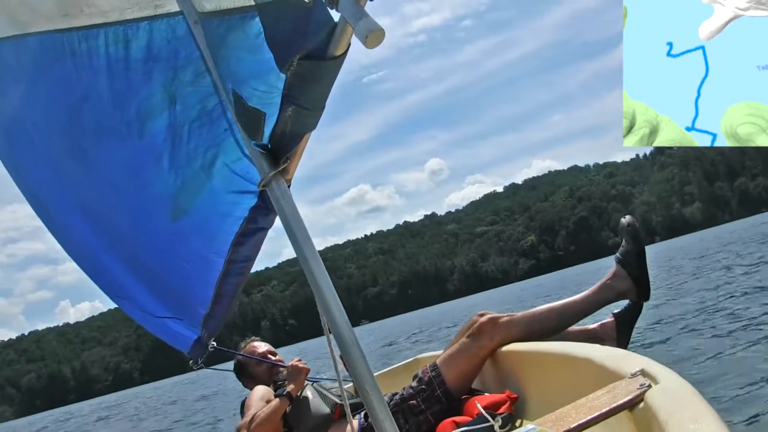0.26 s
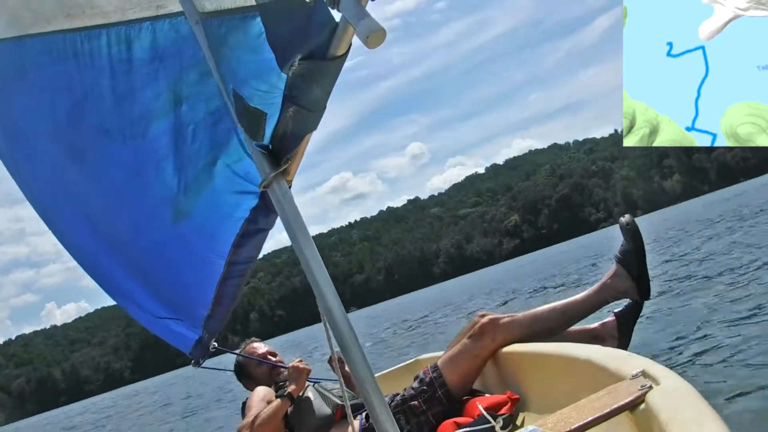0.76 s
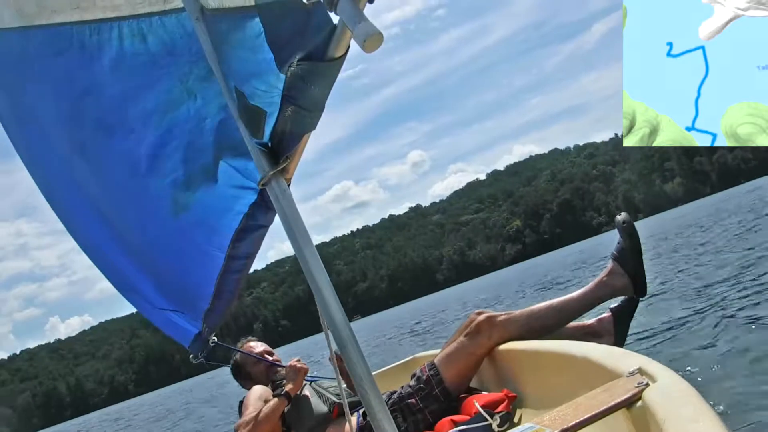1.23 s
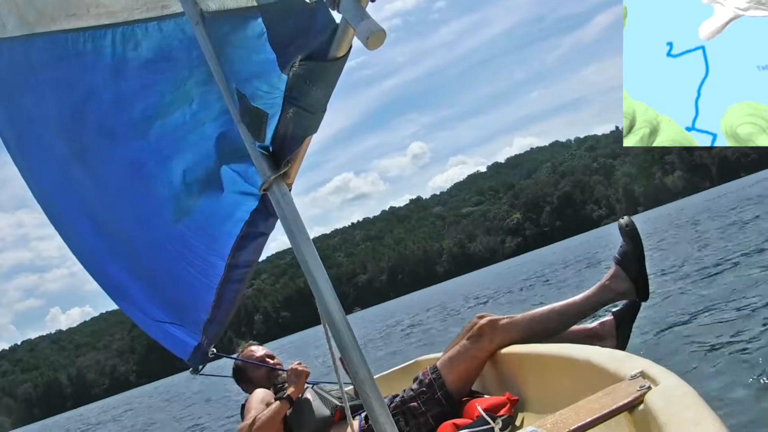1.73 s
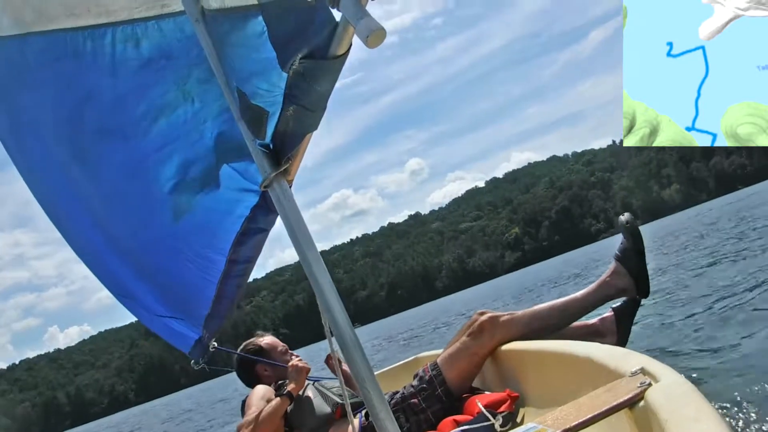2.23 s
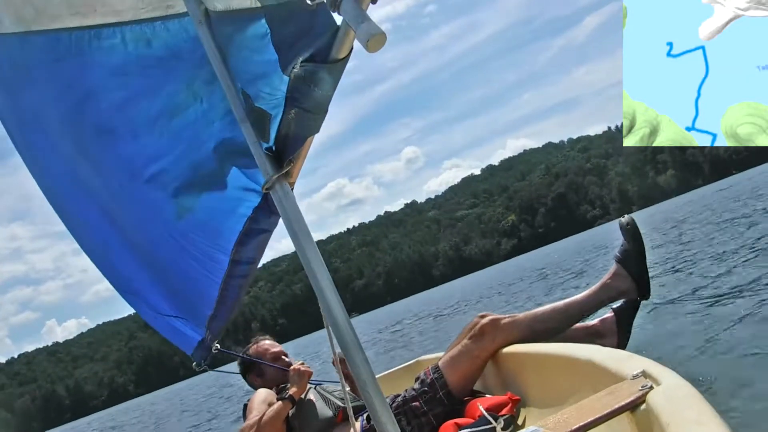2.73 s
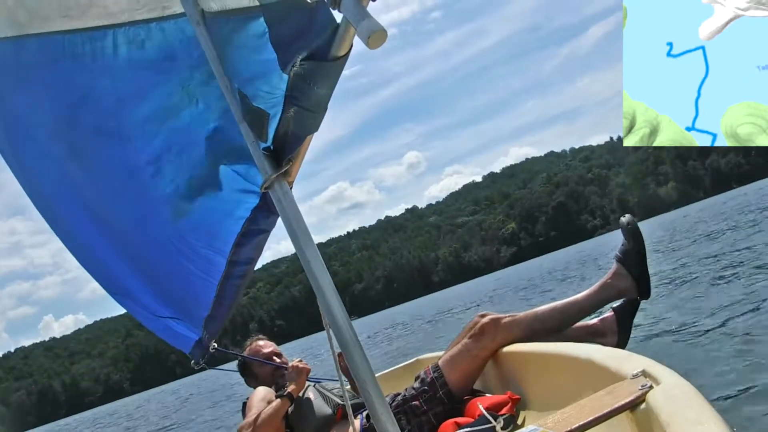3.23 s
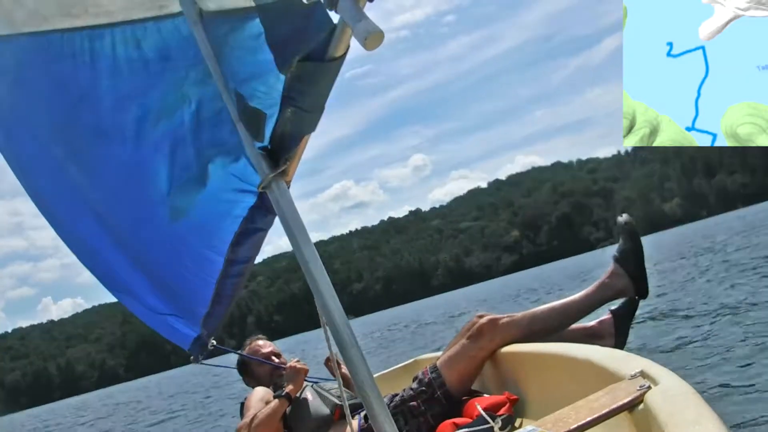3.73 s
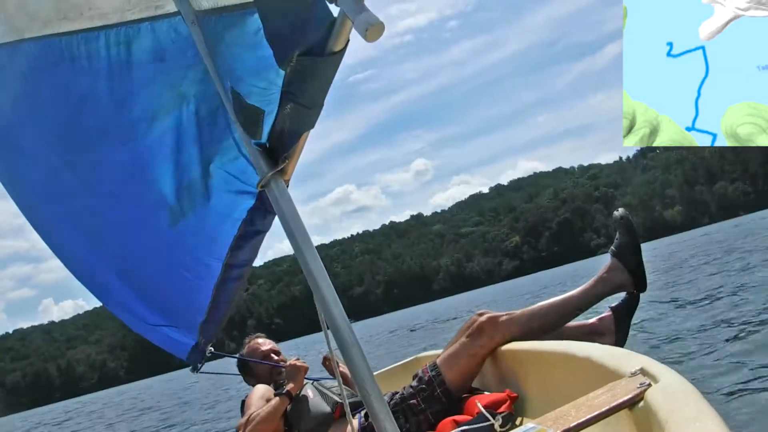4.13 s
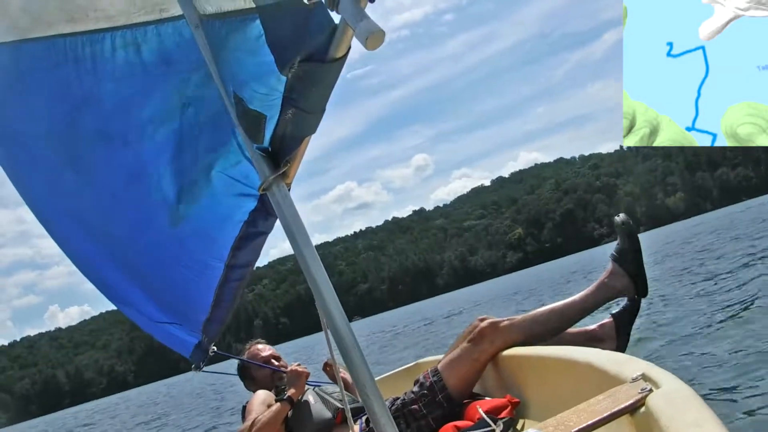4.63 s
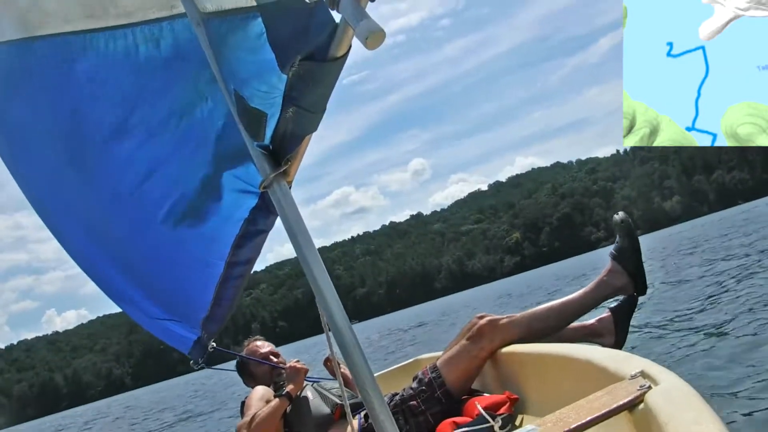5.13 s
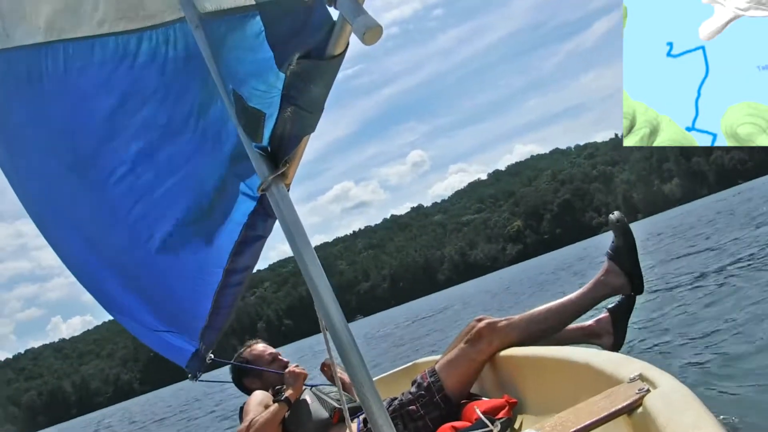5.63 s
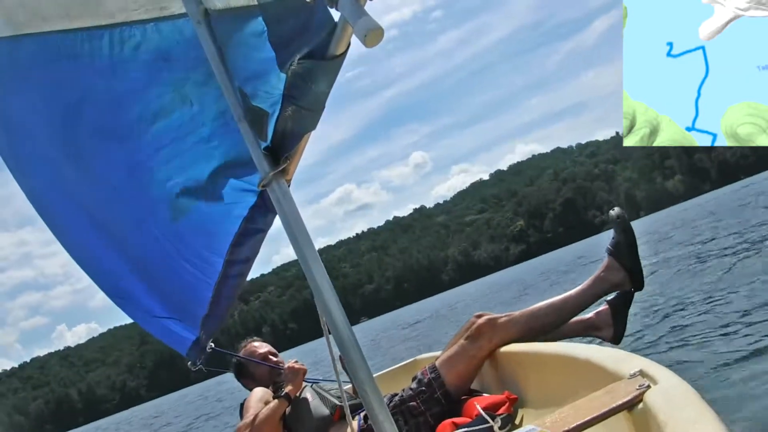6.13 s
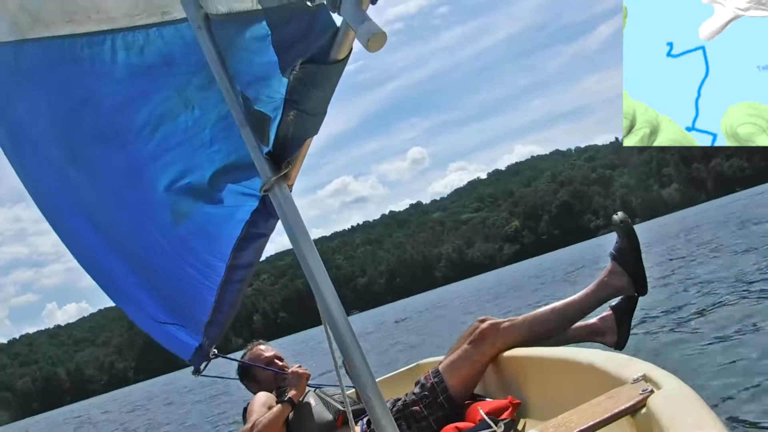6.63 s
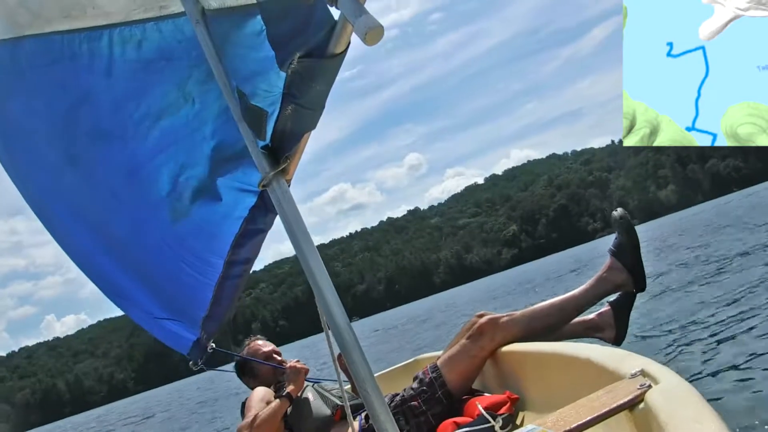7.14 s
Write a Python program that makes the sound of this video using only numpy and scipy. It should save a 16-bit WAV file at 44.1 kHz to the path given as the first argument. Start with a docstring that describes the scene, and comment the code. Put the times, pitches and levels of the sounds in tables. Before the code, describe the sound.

From the start, wavelets break close by against the hull of a small sailboat, an irregular run of gurgling bubbles, froth and fine spray, dotted with sharp slaps, hollow plops and ticking droplets. Wind rumbles on the microphone throughout with short thumping gusts, over a faint hiss from the open lake. A splash with a low plop comes at about 1 second, and the hardest slap lands at 1.6 seconds. A big bubbly splash follows at 2.1 seconds. Smaller laps continue, with a brief wind buffet at 3 seconds and a clear plop at 4. Another big splash with a loud plop breaks at 5 seconds, then the wind buffets hardest until nearly 6 seconds. The water eases slightly before a sharp slap at 6.4 seconds and a last splash with a loud plop at about 7 seconds.

```python
"""A small sailboat heels across a lake. From the start, wavelets break on the hull in ringing bubbles,
froth and spray; slaps crack, air pockets plop, and wind rumbles on the microphone over the far lake hiss.
The hardest slap lands at 1.6 s. Big wavelets break at 2.1 s and 5 s, then the wind buffets hardest.
Another sharp slap comes at 6.4 s, and a last big wavelet with a loud plop at 7 s."""
import sys
import numpy as np
from scipy import signal
from scipy.fft import rfft, irfft
from scipy.io import wavfile
from scipy.ndimage import uniform_filter1d

SR = 44100
rng = np.random.default_rng(int(sys.argv[2]) if len(sys.argv) > 2 else 0)


def generate_wav(signal):
    """Clip the signal to [-1, 1] and save it as 16-bit WAV at the path in sys.argv[1]."""
    frames = np.transpose(np.atleast_2d(signal))
    scaled = np.clip(frames, -1, 1) * 32767
    pcm = np.round(scaled).astype(np.int16)
    wavfile.write(sys.argv[1], SR, pcm)


N = 325017


def from_db(db):
    """Decibels to gain."""
    return 10 ** (np.asarray(db) / 20)


def unit_rms(x):
    """Scale to rms 1."""
    return x / np.sqrt(np.mean(x ** 2) + 1e-20)


def curves(rows):
    """Columns of a time table, one value a sample."""
    time_s, *columns = np.transpose(rows)
    return [np.interp(np.arange(N) / SR, time_s, column) for column in columns]


def gain_at(spectrum, hz):
    """Gain of a dB spectrum, read on a log-frequency axis."""
    freq_hz, level_db = np.transpose(spectrum)
    return from_db(np.interp(np.log(hz), np.log(freq_hz), level_db))


def drift(rate_hz):
    """Slow random wander, rms 1: noise through two one-pole low-passes."""
    hop, settle = 40, 2000
    pole = np.exp(-2 * np.pi * rate_hz * hop / SR)
    noise = rng.standard_normal(N // hop + settle + 2)
    slow = signal.lfilter([1], [1, -2 * pole, pole * pole], noise)[settle:]
    return np.interp(np.arange(N) / hop, np.arange(len(slow)), unit_rms(slow))


def coloured(spectrum):
    """Steady noise of a given spectrum, rms 1."""
    hz = np.maximum(np.fft.rfftfreq(N, 1 / SR), 1)
    return unit_rms(irfft(rfft(rng.standard_normal(N)) * gain_at(spectrum, hz), N))


def bandpass(x, low_hz, high_hz, order=2):
    """Butterworth band-pass."""
    return signal.sosfilt(signal.butter(order, [low_hz, high_hz], "band", fs=SR, output="sos"), x)


def place(track, start_s, peak_db, sound):
    """Mix in a short sound at a given peak level."""
    i = round(start_s * SR)
    track[i:i + len(sound)] += from_db(peak_db) * sound[:N - i] / np.abs(sound).max()


def swell_power(rows, column, rise_s, fall_s, build=0, linger=0, sag_db=0):
    """Swells ramp up, sag and die; build and linger add a share of their length to rise and fall."""
    t, power = np.arange(0, N + 32, 32) / SR, 0
    for start_s, length_s, *levels_db in rows:
        rise = np.clip((t - start_s + rise_s) / (rise_s + build * length_s), 0, 1)
        fall = np.exp(-np.maximum(t - start_s - length_s, 0) / (fall_s + linger * length_s))
        level_db = levels_db[column] - sag_db * np.clip((t - start_s) / length_s, 0, 1)
        power = power + (from_db(level_db) * rise * fall) ** 2
    return np.interp(np.arange(N) / SR, t, power)


# far water: freq_hz, relative_db
LAKE_SPECTRUM = [(120, 23), (200, 7), (392, 3), (728, -9), (1430, 4), (4330, -18.5), (5590, -65.5),
                 (7090, -1), (9830, -28.5), (15500, -49)]


def lake(level_db=-48):
    """Far wash of the lake: a gently wavering hiss."""
    return from_db(level_db + 1.3 * drift(9)) * coloured(LAKE_SPECTRUM)


# wind between gusts: time_s, rumble_db, buffet_db
WIND_LEVELS = [(0.0, -52, -44.5), (0.35, -37.5, -45), (2.67, -36, -43.5), (3.0, -32.5, -34.5),
               (3.2, -41, -42), (3.43, -33.5, -38.5), (4.37, -41.5, -50), (4.41, -38.5, -41),
               (5.17, -27.5, -33.5), (5.21, -39.5, -40), (5.68, -31, -36), (5.7, -31.5, -34.5),
               (5.87, -41.5, -47), (6.12, -40, -43.5), (6.71, -39, -47.5), (6.9, -31, -41.5),
               (7.33, -34.5, -38.5), (7.37, -39, -52)]
# thumps on the port: start_s, length_s, rumble_db
GUSTS = [(.445, 0.035, -33), (.805, 0.028, -27.5), (2.18, 0.056, -30), (2.845, 0.054, -35), (2.96, .1, -45),
         (3.385, .1, -30.5), (3.53, 0.033, -28.5), (3.825, 0.075, -32), (4.395, 0.085, -36.5),
         (4.55, 0.11, -34), (4.84, 0.072, -31.5), (5.32, 0.018, -27.5), (5.7, 0.036, -26),
         (6.66, 0.025, -37), (6.9, 0.032, -30)]
# low and upper wind noise: freq_hz, relative_db
RUMBLE_SPECTRUM = [(12, -31), (20, 0.5), (75, 4.5), (140, -4), (180, -16), (310, -120)]
BUFFET_SPECTRUM = [(70, -14), (130, 1.5), (200, -5), (300, -14), (500, -29), (900, -82)]


def wind(buffet_db_per_gust_db=0.79):
    """Eddies on the microphone port: a lurching rumble with buffeting above it."""
    base_db, buffet_db = curves(WIND_LEVELS)
    gust_power = swell_power(GUSTS, 0, rise_s=0.0035, fall_s=0.007)
    rumble_db = 10 * np.log10(from_db(2 * base_db) + gust_power)
    buffet_db = buffet_db + buffet_db_per_gust_db * (rumble_db - base_db)
    rumble = unit_rms(coloured(RUMBLE_SPECTRUM) * from_db(1.42 * drift(35)))
    buffet = unit_rms(coloured(BUFFET_SPECTRUM) * from_db(2.66 * drift(27)))
    return from_db(rumble_db) * rumble + from_db(buffet_db) * buffet


# fine fizz: freq_hz, relative_db
MIST_SPECTRUM = [(6000, -26), (9000, 11), (12000, -8), (15500, -8)]


def mist(spray_gain, re_spray_db=-23):
    """The finest spray drops: a flickering hiss near the microphone."""
    return spray_gain * from_db(re_spray_db + 2.5 * drift(30)) * coloured(MIST_SPECTRUM)


# close droplets: start_s, peak_db
TICKS = [(.3935, -32), (0.406, -24), (1.389, -36), (1.725, -17.5), (1.8018, -29), (2.1829, -25),
         (2.418, -24), (4.995, -31), (5.0404, -25), (5.0804, -27), (5.4705, -29), (6.608, -29),
         (6.6284, -26), (7.224, -23.5)]


def ticks(spray_gain, faint_count=350, spread_db=2, t60_s=0.0057):
    """Drops burst nearby in bright snaps; faint random ones follow the spray level."""
    out, t = np.zeros(N), np.arange(2500) / SR
    when, size = rng.random((faint_count, 2)).T
    faint_db = 20 * np.log10(spray_gain[(when * N).astype(int)]) + spread_db * (2 * size - 1)
    for start_s, peak_db in TICKS + list(zip(when * N / SR, faint_db)):
        burst = rng.standard_normal(len(t)) * from_db(-60 * t / t60_s)
        place(out, start_s, peak_db, bandpass(burst, 6500, 12000))
    return out


# trapped air pockets: start_s, peak_db, pitch_hz
PLOPS = [(0.072, -20, 1400), (0.128, -23, 903), (.151, -27.5, 500), (0.281, -23, 1124),
         (0.584, -22.5, 1244), (.724, -24, 980), (1.053, -18, 466), (1.157, -28, 550), (1.488, -27, 763),
         (1.544, -18, 863), (1.583, -12, 466), (2.069, -26, 562), (2.097, -14.5, 479), (2.15, -29, 755),
         (2.19, -20.5, 720), (2.745, -21, 1016), (2.785, -25, 1164), (3.231, -20, 1080),
         (3.291, -23.5, 466), (3.791, -21, 804), (4.035, -14, 900), (4.389, -27, 1340), (4.742, -33, 594),
         (4.994, -21, 738), (5.043, -10, 930), (5.524, -27, 580), (5.658, -29, 700), (5.719, -27.5, 508),
         (5.955, -30, 816), (6.125, -17, 915), (6.244, -32, 1523), (6.351, -29, 629), (6.911, -14.5, 595),
         (6.987, -28, 585), (7.046, -9.5, 1126), (7.242, -26, 1540), (7.274, -29.5, 515)]


def plops(rise_s=0.0011, climb_per_s=2.55, roughness=0.84):
    """An air pocket rings as a dying sine that climbs as it nears the surface."""
    out, t = np.zeros(N), np.arange(6000) / SR
    for start_s, peak_db, pitch_hz in PLOPS:
        t60_s = 0.05 * (pitch_hz / 1000) ** -0.76
        wobble = 1 + roughness * unit_rms(uniform_filter1d(rng.standard_normal(len(t)), size=60))
        tone = np.sin(2 * np.pi * pitch_hz * (t + climb_per_s * t * t / 2))
        envelope = (1 - np.exp(-t / rise_s)) * from_db(-60 * t / t60_s)
        place(out, start_s, peak_db, wobble * tone * envelope)
    return out


# clear slaps on the hull: start_s, peak_db, centre_hz
SLAPS = [(.0457, -25, 1820), (.07, -9, 4200), (.125, -28, 4100), (.154, -24, 4850), (.192, -22.5, 2150),
         (.1702, -18, 4700), (.2444, -23, 5030), (.405, -21.5, 2010), (.4726, -25.5, 2580),
         (.5043, -16, 2220), (.5294, -11.5, 4500), (.563, -11.5, 3230), (.7156, -31, 1630),
         (.8834, -25.5, 2750), (.9319, -26, 1590), (.9971, -22, 4150), (1.0245, -24, 1780),
         (1.0472, -24, 2920), (1.059, -26, 3250), (1.154, -17, 3950), (1.2215, -19.5, 3980),
         (1.3034, -23.5, 2420), (1.3886, -26.5, 2150), (1.4172, -33, 1770), (1.5, -22.5, 1970),
         (1.534, -23, 1750), (1.5692, -17, 2720), (1.5879, -3, 4170), (1.657, -15, 5330),
         (1.726, -16, 6700), (1.7978, -25, 7450), (1.827, -19, 7000), (1.9744, -28, 6700),
         (2.0933, -18.5, 2250), (2.184, -13.5, 4100), (2.252, -25.5, 1750), (2.3106, -26, 2300),
         (2.382, -25.5, 3800), (2.4169, -15, 6260), (2.5368, -23.5, 4160), (2.5746, -23.5, 2040),
         (2.5954, -17.5, 4530), (2.627, -15, 2970), (2.744, -13, 4220), (2.7883, -15, 1980),
         (2.815, -15.5, 5030), (2.9152, -23.5, 1750), (2.9861, -25.5, 6700), (3.0066, -21.5, 6300),
         (3.098, -24, 6000), (3.195, -21, 2160), (3.2094, -34, 3980), (3.2612, -19, 1630),
         (3.4096, -28.5, 2740), (3.4505, -25.5, 1540), (3.5297, -25, 5000), (3.6541, -25.5, 6700),
         (3.697, -26, 1860), (3.7172, -18.5, 2270), (3.7721, -26.5, 3040), (3.812, -23, 3100),
         (3.9195, -33.5, 2900), (4.0287, -23, 4320), (4.0856, -23, 4300), (4.2114, -33, 4160),
         (4.333, -27, 4540), (4.4158, -23, 1440), (4.4695, -23, 1740), (4.4936, -23, 4800),
         (4.6104, -27, 3400), (4.78, -29.5, 6250), (4.967, -19, 1830), (4.995, -17, 2330),
         (5.0185, -12, 3350), (5.416, -20, 8800), (5.4365, -23, 3750), (5.466, -23, 4220),
         (5.5107, -24.5, 5070), (5.5563, -30.5, 1820), (5.5722, -14.5, 4060), (5.8596, -29, 6260),
         (5.9542, -26, 3070), (5.982, -25, 1560), (6.0202, -25.5, 4550), (6.099, -28.5, 3070),
         (6.122, -22.5, 2980), (6.245, -23, 1520), (6.2622, -25, 3650), (6.3606, -6.5, 3630),
         (6.571, -32, 6000), (6.6055, -19, 6900), (6.672, -25, 7330), (6.7862, -20, 5200),
         (6.8043, -17.5, 1730), (6.8848, -19.5, 2550), (6.9122, -18, 1640), (6.9646, -21, 4450),
         (7.0357, -18, 2750), (7.206, -27.5, 2040)]


def slaps(froth_gain, faint_count=60, over_froth_db=17, band_ratio=1.254, t60_s=0.032, tail_t60_s=0.11):
    """Water hits the hull: a puff, a broad crack, a spatter tail. Faint random slaps follow the froth."""
    out, t = np.zeros(N), np.arange(5000) / SR
    front = 1 + 1.48 * np.exp(-t / 0.0008)
    envelope = front * from_db(-60 * t / t60_s) + from_db(-14 - 60 * t / tail_t60_s)
    when, _, pitch = rng.random((faint_count, 3)).T
    faint_db = 20 * np.log10(froth_gain[(when * N).astype(int)]) + over_froth_db
    faint_hz = 1540 * (6600 / 1540) ** pitch
    for start_s, peak_db, centre_hz in SLAPS + list(zip(when * N / SR, faint_db, faint_hz)):
        burst = rng.standard_normal(len(t)) * envelope
        puff = unit_rms(bandpass(burst, centre_hz / band_ratio, centre_hz * band_ratio))
        crack = unit_rms(bandpass(burst, 1200, 9000))
        place(out, start_s, peak_db, puff + from_db(-10) * crack)
    return out


def bubbles(spectrum, per_s, t60_cycles, splashes_per_s, splash_s, floor, uneven_db=2.5,
            reach_bands=2.66):
    """Bubbles of uneven size ring briefly; splashes free fading swarms of like pitch. Rms 1."""
    bands, out = 14, 0
    sizes = from_db(uneven_db * np.minimum(rng.exponential(1, N), 4)) * rng.choice([-1, 1], N)
    births = sizes * (rng.random(N) < per_s / SR)
    birth_band = rng.integers(0, bands, N)
    splash_at = np.flatnonzero(rng.random(N) < splashes_per_s / SR)
    centre_band = rng.uniform(0, bands, N)[splash_at]
    strength = rng.exponential(1, N)[splash_at]
    fade = np.exp(-1 / (splash_s * SR))
    for band, hz in enumerate(np.geomspace(spectrum[0][0], spectrum[-1][0], bands)):
        splashes = np.full(N, 1e-18)
        splashes[splash_at] = strength * np.exp(-((band - centre_band) / reach_bands) ** 2)
        swarm = floor + signal.lfilter([1], [1, -fade], splashes)
        kicks = swarm * births * (birth_band == band) + 1e-18
        pole, angle = from_db(-60 * hz / (t60_cycles * SR)), 2 * np.pi * hz / SR
        rings = signal.lfilter([0, np.sin(angle)], [1, -2 * pole * np.cos(angle), pole * pole], kicks)
        soft = bandpass(rings, hz / 1.62, hz * 1.33, order=1)  # onset swells over about a cycle
        out = out + gain_at(spectrum, hz) * np.sqrt(hz) * soft
    # steady flow: level evened out over about 0.1 s
    flow_power = uniform_filter1d(uniform_filter1d(unit_rms(out) ** 2, size=2500), size=2500)
    return unit_rms(out / np.sqrt(flow_power + 0.056))


# ebb of the trickle: time_s, offset_db
TRICKLE_EBB = [(0, 5.5), (1.3, 1), (2.3, 2.5), (3.0, -1.5), (3.6, 2), (3.95, -1), (4.3, 4), (4.7, -0.5),
               (4.9, -1), (5.3, 1), (6.05, -3), (6.45, -4.5), (6.75, -4), (7.37, 6)]
# breaks along the hull: start_s, length_s, gurgle_db, froth_db, spray_db
WAVELETS = [(0, 0.028, -50, -49, -44.5), (.06, 0.078, -45.5, -35, -41.5), (.17, .15, -46, -42, -45.5),
            (.38, 0.069, -47, -44, -39), (.503, 0.067, -44, -35.5, -44), (.716, 0.035, -39.5, -40, -44),
            (.79, 0.014, -48, -44, -59), (.85, 0.12, -48.5, -45.5, -45.5), (1.02, 0.082, -35.5, -32, -38),
            (1.15, .1, -48, -46.5, -46), (1.385, 0.032, -43, -37.5, -37), (1.5, 0.054, -39.5, -45.5, -59),
            (1.575, .04, -34.5, -31, -32.5), (1.7, 0.29, -55, -45.5, -39), (2.07, 0.089, -28, -27.5, -33.5),
            (2.24, 0.24, -49, -49, -44.5), (2.55, .11, -48, -39, -47), (2.735, 0.005, -47, -41, -52),
            (2.78, 0.033, -46.5, -30, -41), (2.95, 0.19, -69, -53, -46.5), (3.19, 0.079, -43, -34, -41),
            (3.37, 0.07, -55, -44.5, -52.5), (3.5, 0.097, -50, -48.5, -52), (3.7, 0.13, -51, -46, -63),
            (4.027, 0.051, -36.5, -35.5, -39.5), (4.34, .17, -47, -39.5, -44),
            (4.53, 0.08, -42.5, -41, -53), (4.7, 0.051, -69, -49.5, -48), (4.992, 0.045, -29.5, -26, -30.5),
            (5.08, 0.67, -58.5, -47.5, -40), (5.42, 0.088, -58, -49, -63), (5.55, 0.03, -38.5, -34, -52),
            (5.62, .12, -41, -42.5, -60), (5.85, 0.11, -65, -50, -49.5), (6.122, 0.04, -36.5, -34, -40.5),
            (6.2, .14, -51, -44.5, -50.5), (6.35, 0.02, -39.5, -34.5, -37), (6.4, 0.15, -51, -55, -50),
            (6.53, 0.15, -78, -50.5, -41.5), (6.785, 0.042, -36, -40.5, -45), (6.87, 0.05, -47, -35, -41.5),
            (6.96, 0.028, -38, -41.5, -58), (7.038, 0.029, -31.5, -28.5, -34),
            (7.18, 0.22, -61, -45.5, -41)]


def wavelet_gains(trickle_db=(-53, -60, -56), fall_s=(0.025, 0.022, 0.019)):
    """Gains of gurgle, froth and spray: wavelets break over an ebbing trickle."""
    ebb_db, = curves(TRICKLE_EBB)
    gains = []
    for k in range(3):
        power = swell_power(WAVELETS, k, rise_s=0.0088, fall_s=fall_s[k], build=0.23, linger=0.17,
                            sag_db=0.5)
        gains.append(np.sqrt(from_db(2 * (trickle_db[k] + ebb_db)) + power))
    return gains


# large, middling and tiny bubbles, lone drops: pitch_hz, relative_db
GURGLE_SPECTRUM = [(250, -2.5), (480, 4), (950, 6), (1500, -1.5)]
FROTH_SPECTRUM = [(1200, -9.5), (2500, -2.5), (4600, -0.5), (5600, -5.5)]
SPRAY_SPECTRUM = [(4800, -10.5), (7200, 16.5), (9500, -4.5), (12000, -7), (15000, -18)]
PLIP_SPECTRUM = [(650, 6), (1500, 1.5), (3000, 6.5), (5000, 12)]


def wavelets(gurgle_gain, froth_gain, spray_gain):
    """Breaking water rings with three sizes of bubble; lone drops plip in the froth."""
    gurgle = bubbles(GURGLE_SPECTRUM, per_s=900, t60_cycles=20, splashes_per_s=41, splash_s=0.0063,
                     floor=0.7)
    froth = bubbles(FROTH_SPECTRUM, per_s=5000, t60_cycles=10.8, splashes_per_s=70, splash_s=0.0075,
                    floor=0.33)
    spray = bubbles(SPRAY_SPECTRUM, per_s=7000, t60_cycles=15.5, splashes_per_s=120, splash_s=0.0019,
                    floor=0.21, reach_bands=2.1)
    plips = bubbles(PLIP_SPECTRUM, per_s=120, t60_cycles=38, splashes_per_s=30, splash_s=0.007,
                    floor=0.55, uneven_db=1)
    return gurgle_gain * gurgle + froth_gain * (froth + from_db(-4) * plips) + spray_gain * spray


def scene(housing_hz=7500):
    """Mono mix: water dulled by the microphone housing; wind, ticks and mist direct."""
    gurgle_gain, froth_gain, spray_gain = wavelet_gains()
    water = lake() + wavelets(gurgle_gain, froth_gain, spray_gain) + slaps(froth_gain) + plops()
    dulled = signal.sosfilt(signal.butter(2, housing_hz, fs=SR, output="sos"), water)
    return (wind() + dulled + ticks(spray_gain) + mist(spray_gain))[None]


# microphone self-noise: freq_hz, relative_db
HISS_SPECTRUM = [(5000, -36), (8000, -2), (11000, -3.5), (16000, -6)]


def record(dry, hiss_db=-65.5, cutoff_hz=15800):
    """Faint steady hiss, then a steep low-pass."""
    noisy = dry + from_db(hiss_db) * coloured(HISS_SPECTRUM)
    return signal.sosfilt(signal.ellip(12, .5, 60, cutoff_hz, fs=SR, output="sos"), noisy)


dry = scene()
out = record(dry)
generate_wav(out)
```